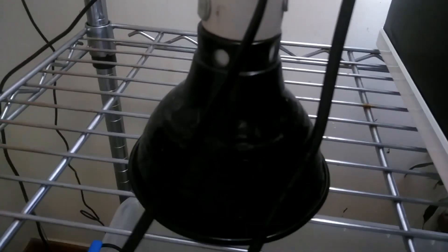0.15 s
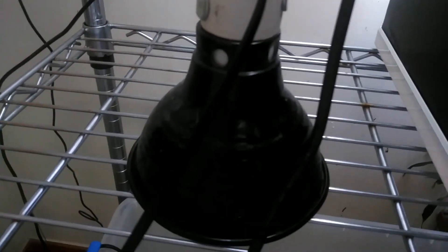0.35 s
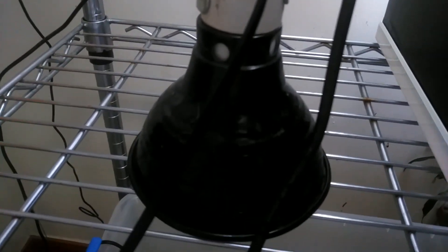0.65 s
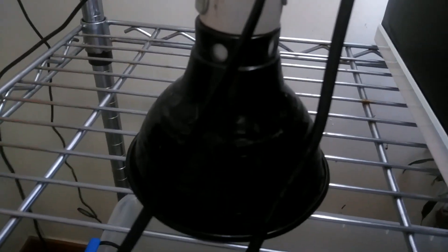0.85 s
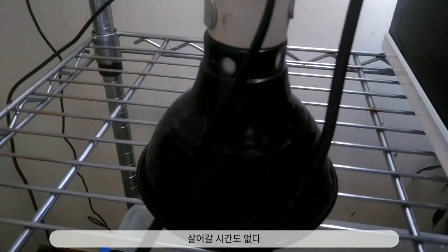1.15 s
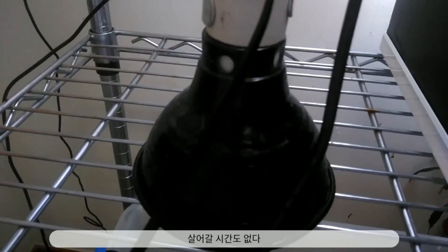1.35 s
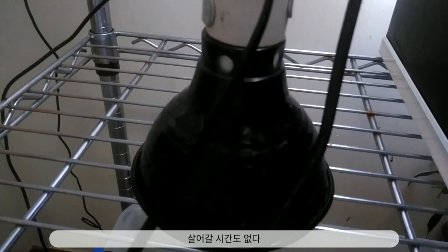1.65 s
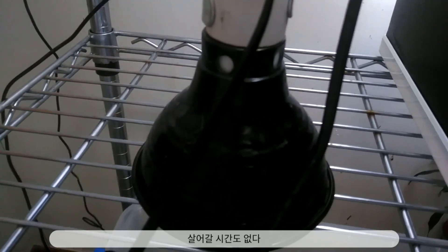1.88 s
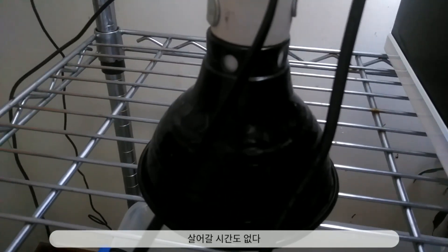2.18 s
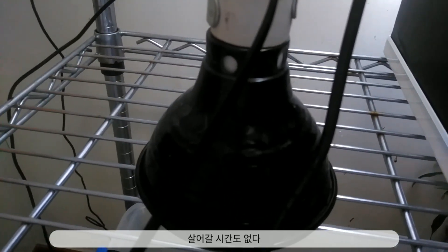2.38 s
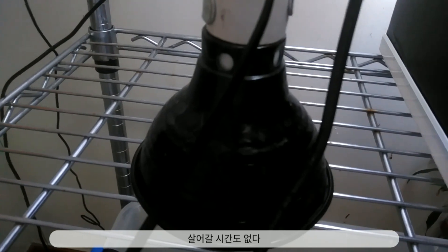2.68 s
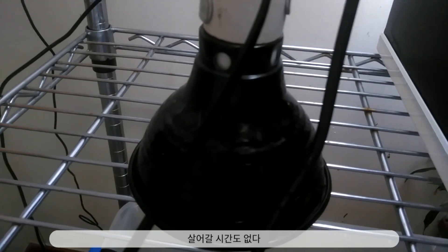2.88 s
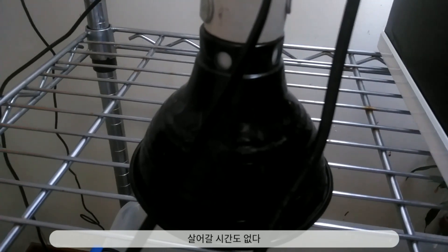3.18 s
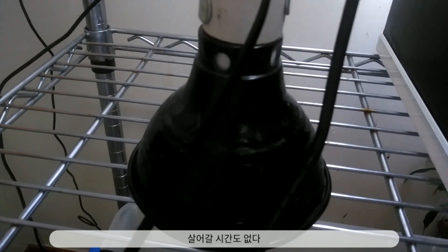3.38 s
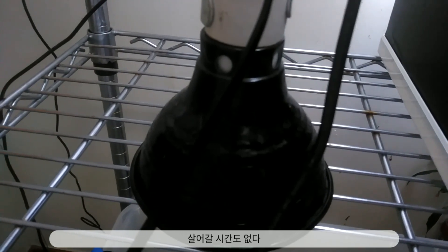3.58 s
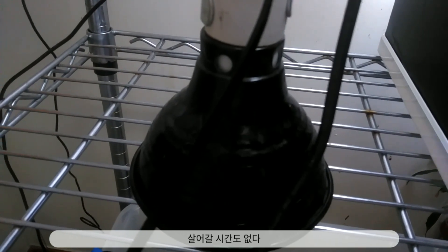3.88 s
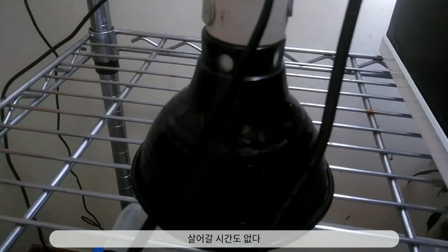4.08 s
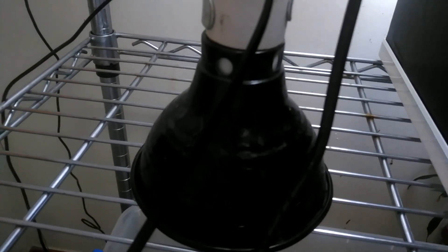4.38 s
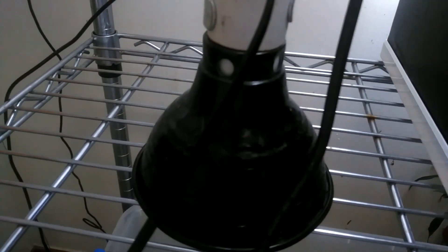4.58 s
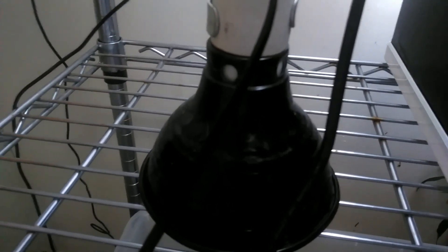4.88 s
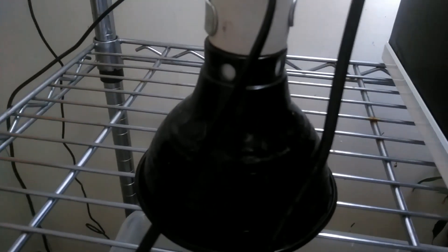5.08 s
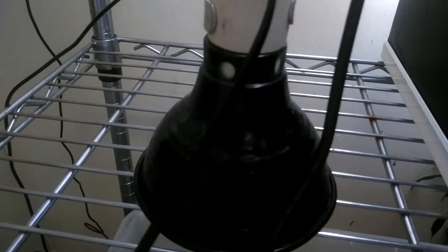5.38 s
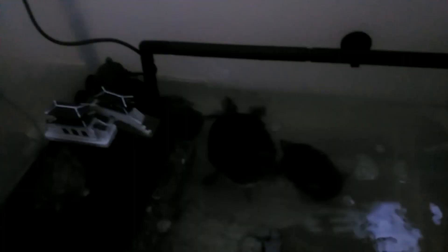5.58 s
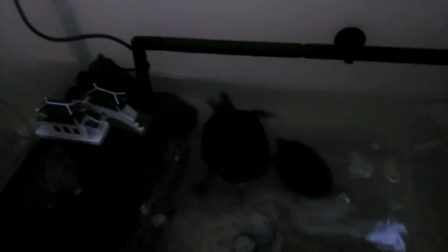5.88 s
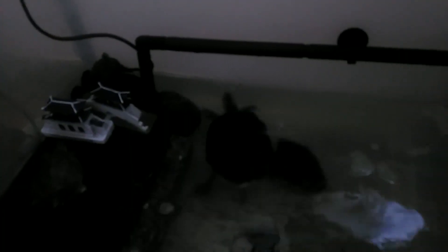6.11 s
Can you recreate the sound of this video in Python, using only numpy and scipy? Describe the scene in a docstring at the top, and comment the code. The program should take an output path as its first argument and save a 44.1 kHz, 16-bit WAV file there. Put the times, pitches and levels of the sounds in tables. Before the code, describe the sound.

In a small room, filter water trickles into an aquarium, picked up by one microphone beside it with dull extreme treble and short, hard echoes. From 0 s, quick bright drips and bubbly plinks patter over a deep, wavering drone around 70 Hz; it fades between 1 and 1.4 s, leaving a soft pump hum. The flow thins around 1.3 s, then plops resume at 1.5 s. Hollow knocks mark 1.8 and 2.3 s, with strong low plops at 2.4 to 2.55 s. A loud round plop falls at 3.55 s, then splashes and sloshing at 3.75 to 3.85 s. Drips continue irregularly, glugging near 4.7 s, thinning around 5.3 s, and a big gurgle comes at 5.6 s. From about 6 s the microphone is right above the water: a deep glug and dense, drier splashes, with a stronger low hum, until the end at roughly 6.25 s.

```python
"""Splashing drops and a deep drone come first; the drone fades out after the first second and a pump hums on.
Water from an aquarium filter trickles into a tank in a small room, heard by one microphone.
Each drop hits as filtered clicks and traps a bubble, a damped tone; swarms of such tones make the trickle.
Sloshes, glugs and knocks come between; random echo paths give the tank and the room, filtered noise the churning.
For the last quarter second the microphone is right above the tank: weaker echoes and other levels of hum."""
import sys
import numpy as np
from scipy import signal
from scipy.fft import rfft, irfft
from scipy.io import wavfile

SR = 44100
rng = np.random.default_rng(int(sys.argv[2]) if len(sys.argv) > 2 else 0)


def master(y):
    """Save y as 16-bit WAV."""
    cut = np.clip(np.atleast_2d(y).T, -1, 1)
    pcm = np.round(cut * 32767)  # scale
    wavfile.write(sys.argv[1], SR, pcm.astype(np.int16))


N = 275625
TIME = np.arange(N) / SR
ABOVE_TANK_S = 5.988  # from here on the microphone is right above the water


def gain_of(db):
    """Level: decibels to an amplitude ratio."""
    return 10 ** (np.asarray(db) / 20)


def evened(x):
    """Normalization: scales a signal to rms 1."""
    return x / np.sqrt(np.mean(x ** 2) + 1e-20)


def read(points, hz):
    """Spectral envelope: interpolates its points on a log-frequency axis."""
    f, value = np.transpose(points)
    return np.interp(np.log(hz + 1), np.log(f + 1), value)


def follow(rows):
    """Temporal envelope: interpolates the columns of a curve table at every sample."""
    s, *columns = np.transpose(rows)
    return [np.interp(TIME, s, c) for c in columns]


def add(mix, start_s, sound):
    """Superposition: adds a sound to the mix from its start time."""
    part = mix[max(round(start_s * SR), 0):][:len(sound)]
    part += sound[:len(part)]


def noise(colour_db):
    """Filtered noise: white noise shaped by a function of frequency, at rms 1."""
    spectrum = rfft(rng.standard_normal(N))
    spectrum *= gain_of(colour_db(np.fft.rfftfreq(N, 1 / SR)))
    return evened(irfft(spectrum, N))


def wander(rate_hz):
    """Random modulation: low-passed noise makes a slow curve of rms 1."""
    return noise(lambda hz: -10 * np.log10(1 + (hz / rate_hz) ** 6))


def resonance_db(hz, centre_hz, half_width_hz):
    """Resonance: the response falls 6 dB at half_width_hz from the centre."""
    return -20 * np.log10(1 + ((hz - centre_hz) / half_width_hz) ** 2)


def click(colour_db, size=1024):
    """Minimum phase: the causal pulse that delivers a given spectrum earliest."""
    log_gain = np.log(gain_of(colour_db(abs(np.fft.fftfreq(size, 1 / SR)))))
    return np.fft.ifft(np.exp(np.conj(signal.hilbert(log_gain)))).real


def above_tank():
    """Microphone position: 0 beside the tank, 1 right above the water."""
    return np.clip((TIME - ABOVE_TANK_S) / .01, 0, 1)


# one strong echo from the wall behind the tank: mean delay, gain re direct sound beside the tank
WALL_ECHO_S, WALL_ECHO_GAIN = .0043, 0.99
CLOSE_WET = 0.33  # share of the echoes that is left right above the water
ROOM_T60_AT_4KHZ_S = 0.18


def echoes(hz, s=0, wall=0.57, tank_db=6.5, tank_t60=0.11, room_db=0.0, absorption=0.48, count=6,
           size=11000):
    """Impulse response: direct sound, discrete reflections, and decaying noise for tank and room (T60 in s)."""
    t = np.arange(size) / SR
    room_t60 = ROOM_T60_AT_4KHZ_S * (4000 / max(hz, 1200)) ** absorption  # high sounds die sooner
    tank, room = rng.standard_normal((2, size)) * (1 - np.exp(-t / 0.0019))
    tank *= gain_of(-60 * t / tank_t60)
    room *= gain_of(-60 * t / room_t60)
    path = (gain_of(tank_db) * evened(tank) + gain_of(room_db) * evened(room)) / np.sqrt(size)
    # near walls at random delays, then the wall behind the tank
    path[rng.integers(30, 330, count)] += wall * rng.choice([-1, 1], count)
    path[round(WALL_ECHO_S * SR * rng.uniform(.9, 1.1))] += WALL_ECHO_GAIN
    if s >= ABOVE_TANK_S:
        path *= CLOSE_WET
    path[0] += 1  # direct sound
    return path


def ring(hz, cycles=7.3, rise=0.031, snap=0.38, edge=1.0, size=2400):
    """Bubble resonance: a pinch-off snap, then a damped tone that rises a little near the surface."""
    t = np.arange(size) / SR
    # decay in cycles, scaled from 3000 Hz: large bubbles ring longest, and no two alike
    life = cycles * (3000 / hz) ** 0.22 * np.exp(0.41 * rng.uniform(-1.7, 1))
    age = t * hz / life
    pitch_hz = hz * (1 + rise * rng.uniform(0, 2.1) * (.5 - np.exp(-age)))
    tone = np.exp(-age) * np.cos(2 * np.pi * np.cumsum(pitch_hz) / SR)
    tone *= np.cos(np.pi / 2 * (t / t[-1]) ** 2)  # fades smoothly to silence
    tone[0] += snap * rng.uniform(.4, 1.6)
    # a bubble radiates almost nothing below its own pitch
    high_pass = signal.butter(5, min(edge, .95) * hz, "high", fs=SR, output="sos")
    return signal.sosfilt(high_pass, tone)


def ping(hz, s=0, **voice):
    """Convolution: one bubble carried along its own echo path."""
    return signal.fftconvolve(ring(hz, **voice), echoes(hz, s))


# strength of the swarming bubbles by pitch: pitch_hz [Hz], gain_db [dB]
TRICKLE_COLOUR = [(300, -7.5), (370, 1.5), (480, -13.5), (580, -6), (900, -74), (1400, 7), (2000, -8.5),
                  (2800, 15), (3700, 23), (4700, -12), (5600, 15), (7300, 14), (8500, -25), (12000, 13)]


def swarm(level, low_hz, high_hz, per_s, spread_db, cycles=20.0, snap=0.35, count=48, size=64):
    """Random superposition: bubbles sound at random times, as strong as the level then; a few stand out."""
    out, energy = np.zeros(N), 0
    birth_chance = per_s * N / SR / (count * size)
    for hz in np.linspace(low_hz, high_hz, count):
        sound = gain_of(read(TRICKLE_COLOUR, hz)) * evened(ping(hz, cycles=cycles, snap=snap))
        own_energy = sound @ sound
        for when, chance, rarity in rng.random((size, 3)):
            if chance < birth_chance:
                strength = gain_of(-spread_db * np.log(rarity + .13))
                add(out, when * N / SR, level[int(when * N)] * strength * sound)
                energy += strength ** 2 * own_energy
    return out / np.sqrt(energy / N)


# relative strength of the trickle between the drops: start_s [s], finest_db [dB], larger_bubbles_db [dB]
FLOW = [(0.0, -40.5, -46.5), (0.55, -51, -57), (0.78, -35.5, -46), (1.06, -49, -52.5), (1.27, -55.5, -77),
        (1.53, -44, -47.5), (1.65, -47, -59.5), (2.18, -55.5, -59), (2.39, -49, -53.5),
        (2.79, -40.5, -56.5), (3.25, -43, -51), (3.5, -42, -46.5), (4.12, -46, -54.5), (4.61, -45.5, -58),
        (4.92, -50.5, -54), (5.4, -49.5, -59), (5.61, -44, -41.5), (5.81, -38.5, -56.5), (6.09, -37, -41),
        (6.25, -52, -37)]


def stream():
    """Source strength: relative levels in dB of the finest and of the larger bubbles."""
    return follow(FLOW)


def surge():
    """Flow fluctuation: how far the larger bubbles' level is from its mean, in dB."""
    large_flow = stream()[1]
    return large_flow - large_flow.mean()


# moments when the stream breaks off: start_s [s], end_s [s]
LULLS = [(.535, .595), (.765, .81), (1.64, 1.69), (2.07, 2.11), (2.665, 2.71), (4.075, 4.125), (4.8, 4.855),
         (5.39, 5.435), (5.685, 5.745)]


def running(lull_db=-12.0):
    """Gating: 1 while the stream runs, much less where it breaks off."""
    return gain_of(lull_db * sum((TIME > start) & (TIME < end) for start, end in LULLS))


def agitation(settle=0.0085, slosh_db=19.5, size=22050):
    """Energy decay: every drop and slosh stirs the surface, which settles with a time constant in s."""
    kicks = np.zeros(N)
    for s, db, *_ in DROPS:
        add(kicks, s, np.array([gain_of(db) ** 2]))
    for s, length, _, db, *_ in SLOSHES:
        add(kicks, s, np.full(round(length * SR), gain_of(db + slosh_db) ** 2 / (length * SR)))
    decay = np.exp(-np.arange(size) / (settle * SR))
    return np.sqrt(abs(signal.oaconvolve(kicks, decay)[:N]))


# spectrum of the still air of the room: frequency_hz [Hz], relative_level_db [dB]
AIR_COLOUR = [(100, 13), (400, -12), (650, -26), (1200, -4), (2500, -17), (8000, -29)]


def air(level_db=-68.0):
    """Ambient noise: a faint, even hush of filtered noise."""
    return gain_of(level_db) * noise(lambda hz: read(AIR_COLOUR, hz))


# spectrum of the churning water: frequency_hz [Hz], relative_level_db [dB]
CHURN_COLOUR = [(20, -28), (35, -0.5), (58, 1.5), (85, 4), (125, -10), (160, 7), (195, -7.5), (255, 4),
                (300, -18), (380, -22.5), (500, -27.5), (660, -41), (1500, -43), (4000, -42)]


def background(churn_db=-41.5, surge_share=0.56, swell_db=4.0, swell_hz=11.2, above_db=-2.5,
               close_db=-37.5, close_hz=216.0, close_width_hz=44.0):
    """Flow noise: low churning follows the stream and swells at random; a low band joins above the tank."""
    level_db = churn_db + surge_share * surge() + swell_db * wander(swell_hz) + above_db * above_tank()
    churn = gain_of(level_db) * noise(lambda hz: read(CHURN_COLOUR, hz))
    close_band = noise(lambda hz: resonance_db(hz, close_hz, close_width_hz))
    return churn + gain_of(close_db) * above_tank() * close_band


# the deep drone: start_s [s], pitch_hz [Hz], level_db [dB]
DRONE = [(0, 67.9, -28.5), (0.15, 68.35, -33.5), (0.45, 72.75, -28), (0.8, 72.1, -30.5), (1.03, 71.8, -31),
         (1.2, 75.2, -43), (1.4, 69, -62)]


def drone(waver_db=3.0):
    """Frequency modulation: one deep tone drifts in pitch, wavers in level and dies away."""
    hz, db = follow(DRONE)
    tone = evened(np.sin(2 * np.pi * np.cumsum(hz) / SR))
    return gain_of(db + waver_db * wander(69)) * tone


MAINS_HZ = 60.0
# the pump's tones: mains_multiple [ratio], beside_tank_db [dB], above_tank_db [dB]
HUM = [(1, -47.5, -46), (2, -44, -52), (3, -43.5, -31), (4, -54.5, -59), (6, -59.5, -47.5), (8, -75, -59)]
# resonances of the filter housing: pitch_hz [Hz], half_width_hz [Hz], beside_tank_db [dB], above_tank_db [dB]
HOUSING = [(212, 3.5, -44.5, -36), (266, 6, -56, -52), (346, 9, -59, -52)]


def pump(waver_db=2.5):
    """Harmonics and resonance: mains tones waver in level, with narrow noise bands for the housing."""
    above = above_tank()
    out = np.zeros(N)
    for k, beside_db, above_db in HUM:
        level_db = beside_db + above * (above_db - beside_db) + waver_db * wander(8.0)
        out += gain_of(level_db) * evened(np.sin(2 * np.pi * (k * MAINS_HZ * TIME + rng.random())))
    for f, half_width, beside_db, above_db in HOUSING:
        level_db = beside_db + above * (above_db - beside_db)
        out += gain_of(level_db) * noise(lambda hz: resonance_db(hz, f, half_width))
    return out


def patter(level_db=-11.5, large_share=0.74):
    """Overlapping resonances: countless weak droplets blend into a soft, wet crackle."""
    fine_flow, large_flow = stream()
    level = gain_of(level_db + fine_flow + large_share * (large_flow - fine_flow)) * running()
    return swarm(level, low_hz=2300, high_hz=5600, per_s=900, spread_db=3.0, count=36, size=256)


def froth(level_db=-24.0):
    """Excitation and decay: small bubbles crowd after each splash and die as the surface settles."""
    return swarm(gain_of(level_db) * agitation(), low_hz=2994, high_hz=9670, per_s=1100, spread_db=10.5,
                 cycles=5.4, snap=0.32, count=40, size=256)


def spray(flow_db=-3.0, stirred_db=-25.0):
    """Size and pitch: flung droplets leave the tiniest, highest bubbles, strongest just after a splash."""
    fine_flow = stream()[0]
    level = np.hypot(gain_of(fine_flow + flow_db) * running(), gain_of(stirred_db) * agitation())
    return swarm(level, low_hz=8400, high_hz=14300, per_s=150, spread_db=5.5)


def trickle(gurgle_db=-59.5, gurgle_share=0.23, large_db=0.0, fine_db=-0.5, stirred_deep_db=-27.5):
    """Size and pitch: large bubbles gurgle, swelling after each splash; smaller ones plink or sizzle."""
    fine_flow, large_flow = stream()
    gurgles = np.hypot(gain_of(gurgle_db + gurgle_share * surge()), gain_of(stirred_deep_db) * agitation())
    plinks = gain_of(large_flow + large_db) * running()
    fizz = gain_of(fine_flow + fine_db) * running()
    return (swarm(gurgles, low_hz=295.8, high_hz=612.3, per_s=110, spread_db=3.5, cycles=10.3)
            + swarm(plinks, low_hz=1219, high_hz=4563, per_s=160, spread_db=5.0)
            + swarm(fizz, low_hz=4320, high_hz=9450, per_s=700, spread_db=9.5, size=128))


# resonances and dead spots of the tank and things around it: pitch_hz [Hz], full_width_hz [Hz], lift_db [dB]
TANK_MODES = [(1105, 18, 9), (2003, 18, 5), (2200, 23, 7), (2320, 70, -4), (2440, 50, 7), (2710, 34, 5),
              (2810, 70, -4), (2950, 70, 5.5), (3732, 35, 6), (4220, 120, -3), (5180, 160, 3.5),
              (5410, 60, 4), (5800, 110, -3), (6004, 65, 2.5)]


def tank_colour(x):
    """Modal filtering: the tank's resonances colour whatever excites them."""
    def lift_db(hz):
        return sum(db / (1 + (2 * (hz - f) / width) ** 2) for f, width, db in TANK_MODES)
    return signal.oaconvolve(x, click(lift_db, size=8192))[:N]


# hollow knocks, where water strikes the side of the tank: start_s [s], level_db [dB]
KNOCKS = [(.426, -36.5), (1.758, -43), (1.798, -40.5), (2.015, -47), (2.113, -44.5), (2.294, -37),
          (2.383, -60), (4.133, -48), (5.143, -46), (5.775, -52), (6.214, -57)]
# the spectrum of a knock: frequency_hz [Hz], relative_level_db [dB]
KNOCK_COLOUR = [(150, -45), (480, 6), (720, -17.5), (1080, 9.5), (1400, -33), (2100, 16.5), (3500, -48),
                (8000, -55)]


def knocks(size=880):
    """Impulse excitation: a dull blow on the wall, rung out by the tank and the room."""
    out = np.zeros(N)
    blow = click(lambda hz: read(KNOCK_COLOUR, hz))
    for s, db in KNOCKS:
        sound = signal.fftconvolve(blow, echoes(hz=1100))
        add(out, s, gain_of(db) * sound / np.std(sound[:size]))
    return out


# the water sloshes and folds: start_s [s], length_s [s], pitch_hz [Hz], level_db [dB]
SLOSHES = [(3.737, 0.067, 674, -60), (3.829, 0.06, 1680, -40.5), (3.833, 0.064, 507, -44),
           (4.57, 0.085, 974, -56), (4.665, 0.066, 499, -44), (4.985, .15, 549, -56.5),
           (5.525, 0.078, 820, -50.5), (5.573, .085, 1123, -39.5), (5.582, 0.084, 393, -41),
           (5.987, 0.048, 1182, -33), (5.988, 0.063, 557, -45.5), (6.057, .17, 1496, -47)]


def sloshes(spread_octaves=0.554, edge_db=-14.5, count=22):
    """Bubble cloud: folding water traps bubbles of mixed sizes (pitch +- spread), each gliding upward."""
    out = np.zeros(N)
    for s, length, hz, db in SLOSHES:
        cloud = np.zeros(SR // 2)
        times = rng.beta(1.1, 2, count)
        offsets = rng.permutation(np.linspace(-1, 1, count))
        for when, offset in zip(times, offsets):
            bubble = ping(hz * 2 ** (spread_octaves * offset), s, cycles=11.0, rise=0.06, snap=0.2)
            add(cloud, when * length, gain_of(edge_db * abs(offset)) * evened(bubble))
        add(out, s, gain_of(db) * cloud / np.std(cloud[:round(length * SR)]))
    return out


# big pockets of air that ring with a round glug: start_s [s], pitch_hz [Hz], level_db [dB]
GLUGS = [(.04, 378.4, -49), (.25, 362, -50), (.428, 232, -36.5), (.432, 354, -45), (.612, 740, -58.5),
         (.82, 370, -47.5), (.925, 875, -60), (1.18, 1085, -60), (1.545, 1070, -56), (2.103, 897, -52),
         (2.294, 570, -48.5), (2.385, 1470, -53), (2.434, 247, -40), (2.438, 544, -64), (2.552, 254, -35),
         (2.556, 510, -53), (3.039, 510, -55), (3.125, 345, -37.5), (3.135, 490, -52), (3.37, 1440, -56),
         (3.67, 700, -61), (3.743, 333, -35.5), (3.768, 486, -50.5), (3.776, 945, -53.5),
         (3.829, 359, -38.5), (3.836, 887, -48), (3.845, 519, -41), (4.028, 1110, -60),
         (4.033, 1440, -49.5), (4.134, 900, -54), (4.588, 697, -49.5), (4.598, 774, -47.5),
         (4.609, 1605, -47.5), (4.675, 493, -47), (4.688, 704, -52), (4.699, 341, -37.5),
         (4.982, 1250, -54), (5.143, 1047, -54), (5.52, 765, -52), (5.586, 1120, -36.5),
         (5.591, 375, -30.5), (5.612, 331, -31), (5.639, 362, -34), (5.645, 1440, -44), (5.773, 873, -55),
         (5.773, 1540, -50.5), (5.992, 167.5, -24), (5.995, 327, -32), (5.997, 916, -43.5),
         (6.025, 1510, -35.5), (6.032, 102.3, -32.5), (6.039, 369, -33), (6.047, 590, -45.5),
         (6.095, 1750, -43), (6.14, 1750, -44), (6.216, 1320, -45.5), (6.238, 1300, -52)]


def glugs(level_db=0.0, swell_s=0.0029, size=8000):
    """Volume resonance: a big air pocket swells into a round tone that bends upward near the surface."""
    out = np.zeros(N)
    swell = 1 - np.exp(-np.arange(size) / (swell_s * SR))
    for s, hz, db in GLUGS:
        pocket = swell * ring(hz, cycles=4.46, rise=0.048, size=size)
        sound = signal.fftconvolve(pocket, echoes(hz, s, tank_db=6.0, room_db=0.0))
        add(out, s, gain_of(db + level_db) * sound / np.std(sound[:SR // 25]))
    return out


TRAP_S = .0015  # a bubble pinches off this long after the impact


def bubbles(level_db=0.5):
    """Bubble resonance: the bubble under each drop rings with a round plop along its own echo path."""
    out = np.zeros(N)
    for s, _, _, hz, db in DROPS:
        bubble = ring(hz, cycles=10.4, rise=0.012, snap=0.44)
        sound = signal.fftconvolve(bubble, echoes(hz, s, wall=0.56, tank_db=5.5, room_db=4.0))
        add(out, s + TRAP_S, gain_of(db + level_db) * sound / np.std(sound[:660]))
    return out


# the clearest drops, each trapping one bubble; levels are relative, weight is body re treble:
# start_s [s], impact_db [dB], weight_db [dB], bubble_pitch_hz [Hz], bubble_level_db [dB]
DROPS = [(0.006, -29, 14, 2540, -37.5), (0.035, -22.5, 9, 3960, -44), (0.088, -58, 6, 2890, -31.5),
         (0.091, -62, 16, 1830, -39.5), (0.142, -19.5, -5, 5530, -37), (0.178, -26.5, -10, 5830, -33),
         (0.181, -51, -5, 1915, -43), (0.219, -31, -32, 8730, -21.5), (0.264, -31, -6, 1810, -36.5),
         (0.268, -48, 3, 2850, -38.5), (0.297, -42, -24, 9050, -29), (0.309, -30.5, 2.5, 5100, -40),
         (0.324, -50, 3, 2580, -44), (0.36, -26, 2.5, 5240, -41.5), (0.391, -32, 8, 2930, -53),
         (0.415, -24, 3.5, 3000, -57), (0.425, -19.5, 9, 2650, -24.5), (0.474, -30, -2, 7060, -35),
         (0.508, -32.5, 10.5, 2610, -37.5), (0.512, -35, -4, 5100, -40), (0.601, -24.5, -3, 4120, -31),
         (0.65, -34, -12, 5700, -32.5), (0.671, -42, -19, 8600, -33), (0.693, -32.5, 1.5, 5700, -30),
         (0.754, -42, 2, 2770, -43), (0.788, -48, 3, 2650, -42.5), (0.815, -25, -6, 5300, -27),
         (0.816, -50, 3, 2880, -46), (0.85, -29, 4.5, 2600, -43), (0.855, -50, -2, 1610, -45),
         (0.922, -25, 1.5, 2590, -36.5), (0.928, -54, 0, 1710, -50), (0.949, -48, 0, 5200, -49),
         (0.969, -36, -22, 7040, -36), (0.987, -30, -17, 7700, -28), (1.023, -26, 5.5, 6400, -28),
         (1.038, -22.5, 6.5, 3810, -35), (1.063, -31.5, 10, 2950, -37), (1.072, -61, -4, 1474, -34.5),
         (1.101, -48, -5, 5730, -43), (1.15, -36, 15, 6970, -30.5), (1.172, -37.5, 14, 1790, -47),
         (1.196, -32, 7, 3580, -36), (1.23, -46.5, 45, 2560, -40.5), (1.273, -45, -4.5, 6700, -45),
         (1.368, -60, -10, 5230, -47.5), (1.394, -61, -22, 6160, -41), (1.506, -28.5, 17.5, 2110, -25.5),
         (1.539, -20, 10.5, 2880, -29.5), (1.567, -32, -13, 6970, -47), (1.705, -58, -3, 4190, -43),
         (1.712, -57, -5, 5370, -45), (1.736, -29.5, 1.5, 2870, -67), (1.757, -30.5, 11, 3056, -30),
         (1.797, -25.5, 7.5, 1936, -35.5), (1.87, -31.5, 4, 4380, -33.5), (1.877, -28, -12, 8020, -22),
         (1.936, -34, -13, 10500, -30), (1.991, -38, -10, 4600, -40.5), (2.003, -31.5, 0, 6720, -49),
         (2.023, -46, 14, 10000, -28.5), (2.08, -51, 20, 9300, -37), (2.106, -39.5, 1, 1845, -42),
         (2.115, -31, -3, 2350, -36.5), (2.177, -29.5, -2, 4970, -34), (2.254, -61, -15, 6930, -37.5),
         (2.288, -36, 17, 4500, -45), (2.292, -16, -13, 3960, -31.5), (2.364, -41, 9, 4650, -42),
         (2.382, -21.5, 10.5, 2500, -51), (2.405, -42, 23, 3790, -24.5), (2.432, -20.5, 18, 2450, -18),
         (2.479, -26.5, -30, 9000, -39), (2.55, -16.5, -6, 6510, -21), (2.649, -36, -34, 2920, -39.5),
         (2.665, -64, 0, 1470, -58), (2.714, -39.5, 15, 2310, -47), (2.795, -29, -11, 6700, -38),
         (2.844, -51, -10, 5400, -44), (2.851, -51, -18, 7400, -36.5), (2.888, -46, -3, 7500, -40),
         (2.935, -45, 9, 2020, -53.5), (2.959, -41, 22, 3500, -49), (3, -19.5, -12.5, 5980, -28),
         (3.04, -58, -8, 2175, -45), (3.137, -25.5, -8, 2446, -42), (3.157, -31, -17, 5250, -35),
         (3.224, -49, -10, 6200, -38.5), (3.237, -55, 5, 1950, -50), (3.282, -34, 10.5, 2094, -37.5),
         (3.312, -66, -5, 1900, -52), (3.365, -21.5, 5.5, 2540, -29.5), (3.394, -38.5, 17, 2880, -39.5),
         (3.429, -34, -4, 3400, -36), (3.455, -20.5, 1, 4840, -29.5), (3.503, -35, -19, 4420, -29),
         (3.552, -17, -1, 3024, -17), (3.631, -32, -48, 7600, -31), (3.672, -50, 21, 2980, -46),
         (3.699, -42, -5, 5070, -42), (3.707, -52, 2, 3850, -41.5), (3.744, -18, -13.5, 5500, -23),
         (3.838, -24.5, -2, 2390, -30.5), (3.944, -34, -19, 6460, -47), (3.987, -32.5, 12.5, 7100, -30.5),
         (4.022, -28, 5, 2420, -43), (4.125, -42, -2, 3470, -50), (4.131, -18.5, 0, 6050, -56),
         (4.175, -31, 3, 3140, -42), (4.23, -57, 10, 2920, -46), (4.262, -44.5, 20, 4370, -43),
         (4.305, -65, 5, 2340, -56), (4.335, -33.5, 7, 5130, -25), (4.338, -42, 7, 3150, -37.5),
         (4.361, -26.5, 1, 4750, -32), (4.367, -48, 5, 1750, -51), (4.395, -21.5, -4, 4430, -36),
         (4.458, -49, 0, 2370, -51.5), (4.492, -52, -7, 3930, -39.5), (4.543, -61, -4, 4280, -38.5),
         (4.562, -17, -16, 4980, -25.5), (4.603, -23, -14, 5500, -32), (4.655, -30, 0, 3560, -38),
         (4.697, -34, 2, 3600, -40), (4.727, -46, -15, 7360, -37), (4.763, -44, -11, 3550, -53),
         (4.775, -56, -3, 2650, -48), (4.819, -56, -9, 6500, -43.5), (4.862, -56, -10, 3650, -37),
         (4.887, -59, -10, 6550, -39), (4.946, -61, 3, 3650, -41), (4.981, -78, -8, 1380, -48.5),
         (5.058, -29.5, 18.5, 2280, -24), (5.12, -30.5, 11, 1644, -38.5), (5.144, -21, 9, 3200, -59),
         (5.183, -42, 4, 2310, -47), (5.195, -26.5, 6, 3890, -31.5), (5.268, -52, 4, 2560, -48),
         (5.276, -36, -7, 5400, -49), (5.298, -45, 16, 1790, -49), (5.362, -46, 36, 2350, -44),
         (5.436, -62, 9, 3600, -50), (5.471, -62, 16, 2900, -42.5), (5.565, -50, 6, 6000, -42),
         (5.579, -38, 21, 2920, -48), (5.596, -42, 4, 6720, -30.5), (5.63, -35, 9, 2900, -52),
         (5.647, -53, -5, 2370, -37.5), (5.672, -52, -1, 5600, -36), (5.772, -21.5, -3.5, 3040, -26.5),
         (5.814, -33, 0, 2690, -32.5), (5.851, -51, -5, 3200, -36), (5.869, -22, 1, 7160, -25),
         (5.925, -49, -8, 5940, -38), (5.95, -29, 4, 3870, -34), (5.993, -19.5, 0, 2380, -28.5),
         (5.999, -28.5, 24.5, 3380, -30), (6.025, -20.5, 7, 3240, -36), (6.029, -43, -4, 1267, -33.5),
         (6.044, -25, -4, 5240, -23), (6.057, -21, -1, 6000, -23), (6.094, -25.5, -5, 2135, -38),
         (6.095, -38, 0, 3750, -36), (6.128, -45, -3, 2010, -39), (6.146, -47, 2, 4920, -29),
         (6.149, -47, 0, 3790, -38), (6.163, -26, 1, 4960, -35), (6.185, -29, 2.5, 7600, -27),
         (6.214, -17.5, 7, 3350, -36), (6.228, -28.5, 18, 2270, -30)]
# the spectrum shared by all splashes: frequency_hz [Hz], gain_db [dB]
SPLASH_COLOUR = [(100, 20), (190, 18), (330, 32.7), (700, 0.47), (1100, 4.1), (1700, 6.6), (2400, 2.7),
                 (4500, 5.1), (6500, 12.7), (7400, 9.1), (8300, 13.2), (9500, 8.7), (15000, 2.6)]


def splashes(level_db=-4.5, body_db=-2.0, slap_db=-30.0, spray_db=-5.5, dulling=0.48, scatter=0.013,
             foam=0.2, colour_db=4.0, stagger_s=.004, order=3, count=12, size=440):
    """Impact: staggered clicks and a puff of tiny bubbles; heavy drops are fuller and duller, none alike."""
    out = np.zeros(N)
    treble = signal.butter(2, [4500, 9000], "band", fs=SR, output="sos")
    tiny = [ring(hz) for hz in np.linspace(3000, 14000, 60)]
    for s, db, weight, *_ in DROPS:
        tilt = [(1400, weight + slap_db), (2400, weight + body_db), (3800, weight + body_db),
                (5200, 0.00092), (8000, 0.012), (10000, spray_db - dulling * weight)]
        impact = np.zeros(SR // 10)
        # the drop breaks up: the first click at once, the others staggered
        for k, delay in enumerate(rng.uniform(0, stagger_s, order)):
            impact[round(delay * SR) if k else 0] += rng.choice([-1, 1]) / np.sqrt(order)
        # the puff of bubbles dragged under, at a mean delay of scatter (s)
        for delay, pick in zip(rng.exponential(scatter, count), rng.integers(0, len(tiny), count)):
            add(impact, delay, foam * tiny[pick] / np.linalg.norm(tiny[pick]))
        own = list(zip(np.linspace(1000, 15000, 24), colour_db * rng.standard_normal(24)))
        colour = click(lambda hz: read(tilt, hz) + read(own, hz) + read(SPLASH_COLOUR, hz))
        sound = signal.fftconvolve(signal.fftconvolve(impact, colour), echoes(hz=5050, s=s))
        # the impact level sets the treble of the first 10 ms
        add(out, s, gain_of(db + level_db) * sound / np.std(signal.sosfilt(treble, sound[:size])))
    return out


def scene():
    """Superposition: tank-coloured water, direct bubbles, pump, drone and background noise."""
    in_tank = splashes() + knocks() + trickle() + patter() + froth() + spray()
    water = tank_colour(in_tank) + bubbles() + sloshes() + glugs()
    return (water + pump() + drone() + background() + air())[None]


# the microphone's steep loss of treble: frequency_hz [Hz], gain_db [dB]
MICROPHONE = [(20, -5), (7300, -4.5), (8200, -21.5), (9500, -31), (15000, -39.5)]
EDGE_HZ = 15730  # upper band limit


def record(dry):
    """Linear filtering: the microphone's colour, then the band limit."""
    heard = signal.oaconvolve(dry, click(lambda hz: read(MICROPHONE, hz))[None])[:, :N]
    low_pass = signal.firwin(511, EDGE_HZ, window=("kaiser", 9), fs=SR)
    return signal.oaconvolve(heard, low_pass[None], "same")


dry = scene()
out = record(dry)
master(out)
```